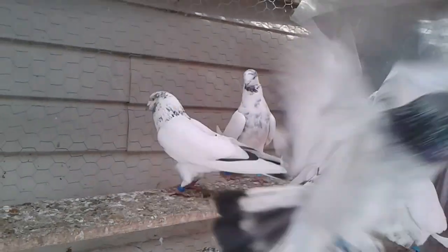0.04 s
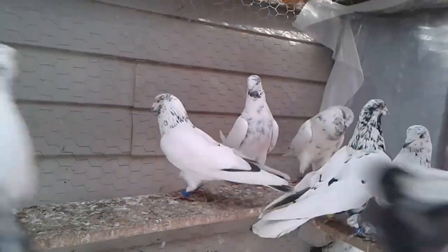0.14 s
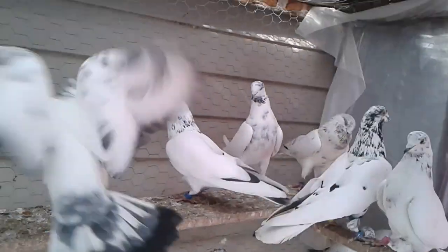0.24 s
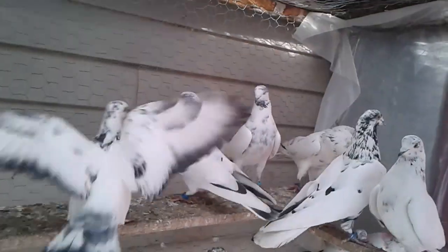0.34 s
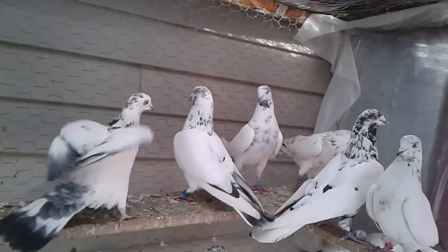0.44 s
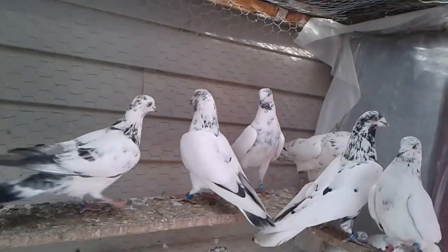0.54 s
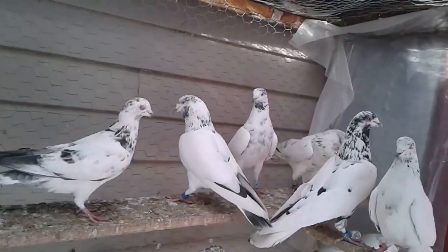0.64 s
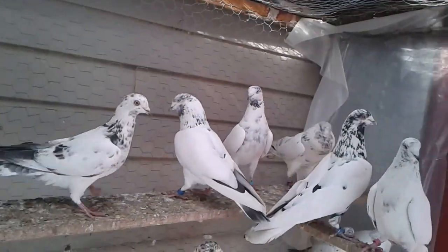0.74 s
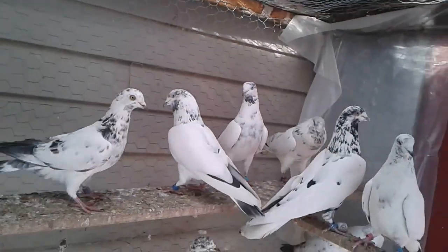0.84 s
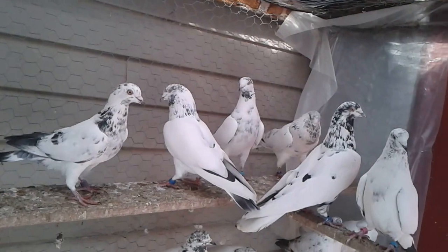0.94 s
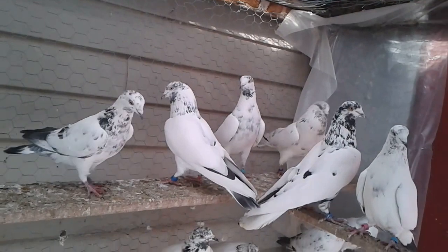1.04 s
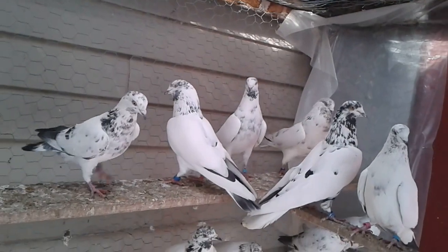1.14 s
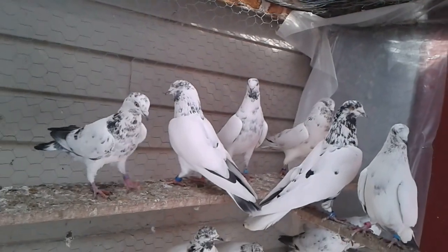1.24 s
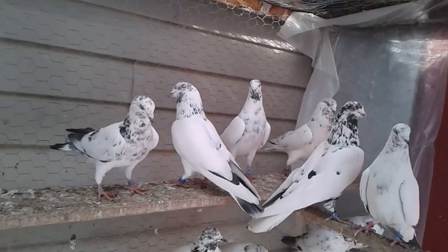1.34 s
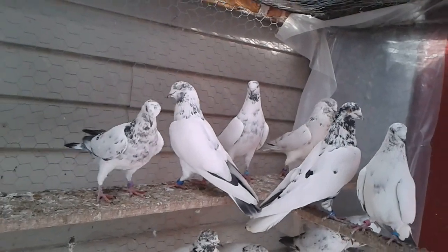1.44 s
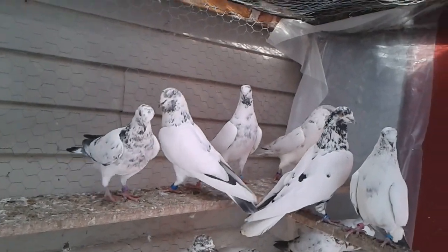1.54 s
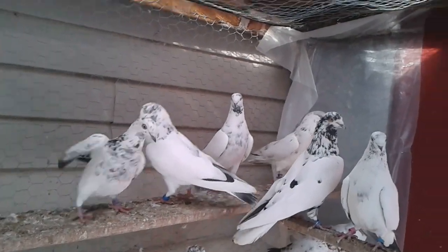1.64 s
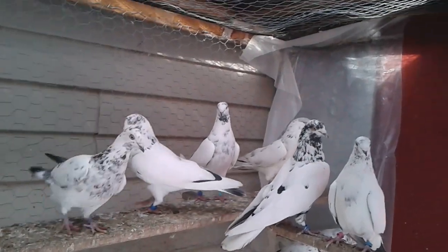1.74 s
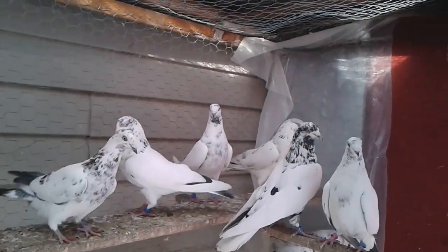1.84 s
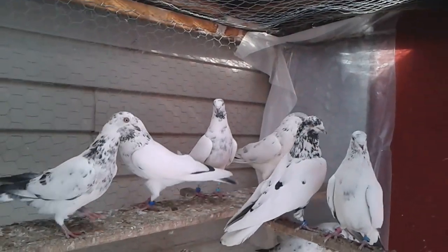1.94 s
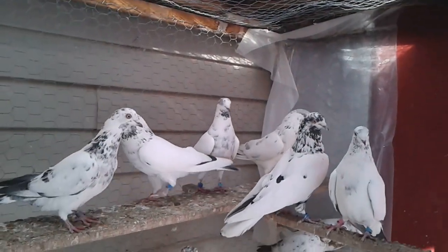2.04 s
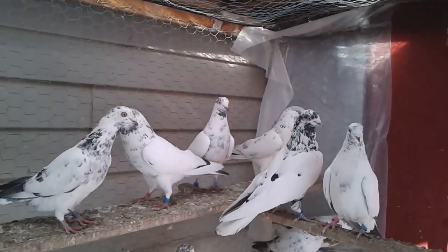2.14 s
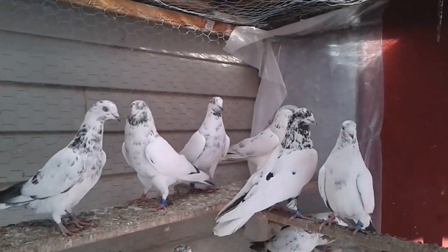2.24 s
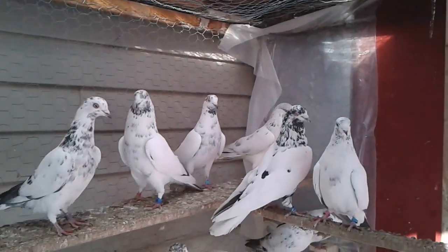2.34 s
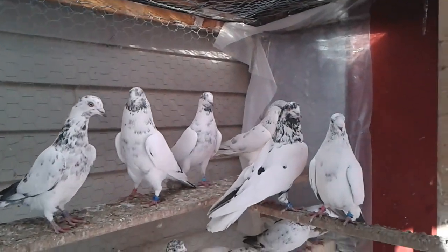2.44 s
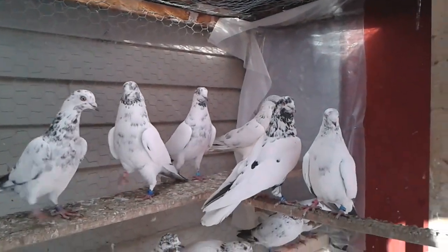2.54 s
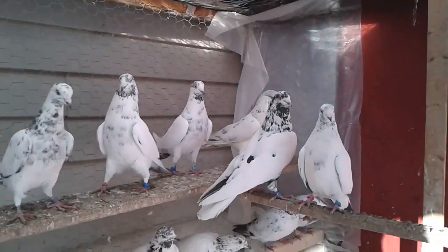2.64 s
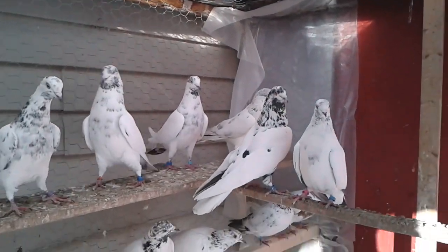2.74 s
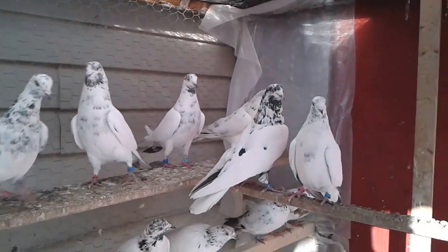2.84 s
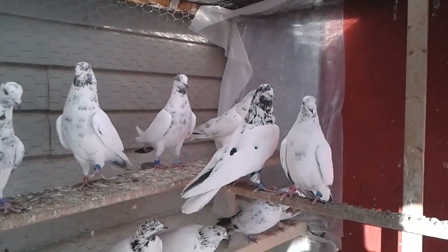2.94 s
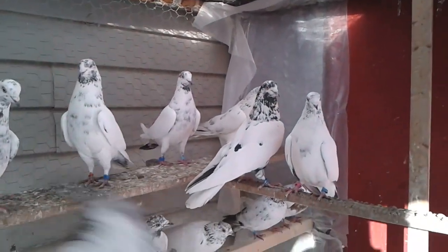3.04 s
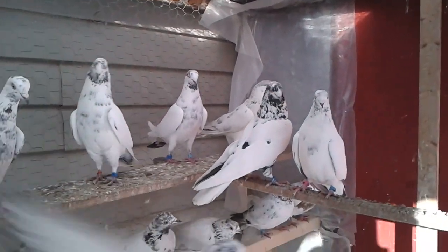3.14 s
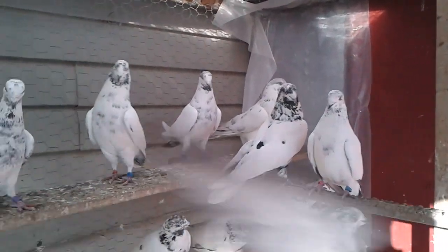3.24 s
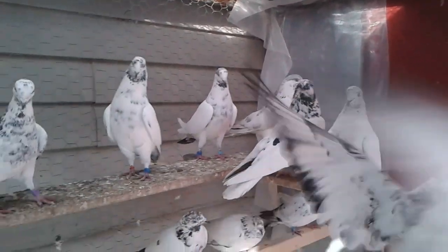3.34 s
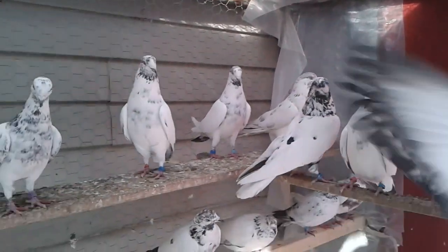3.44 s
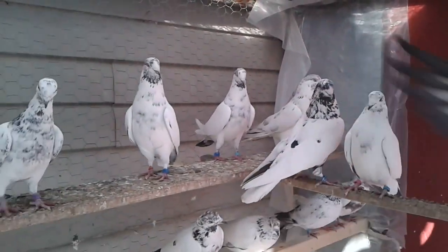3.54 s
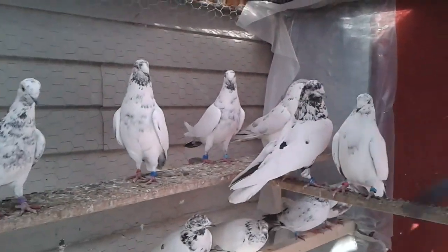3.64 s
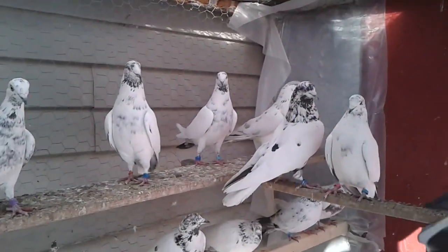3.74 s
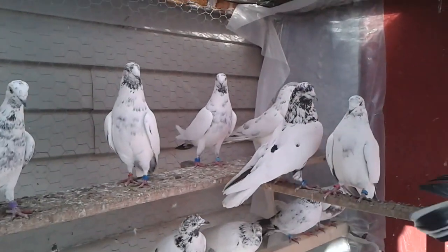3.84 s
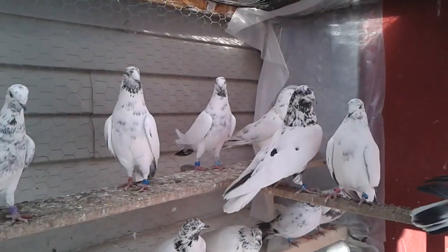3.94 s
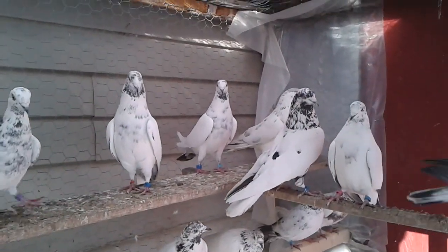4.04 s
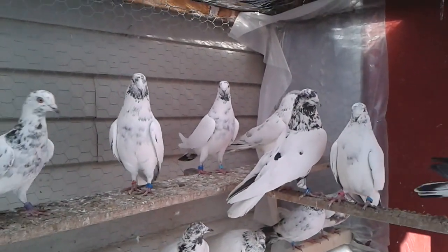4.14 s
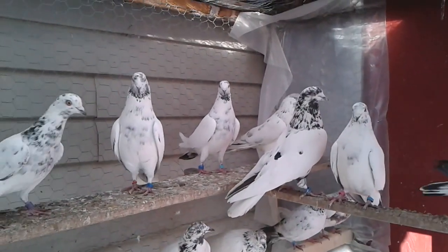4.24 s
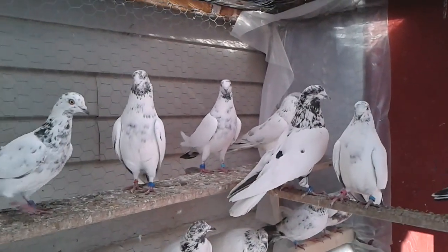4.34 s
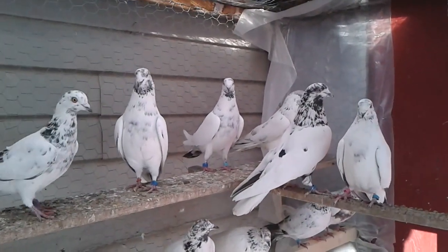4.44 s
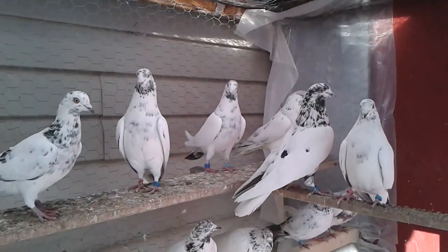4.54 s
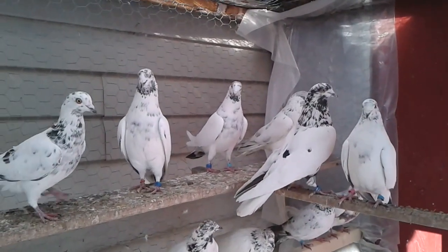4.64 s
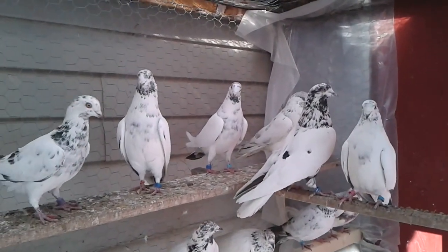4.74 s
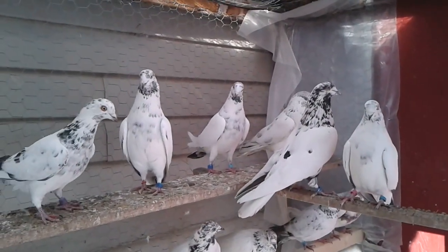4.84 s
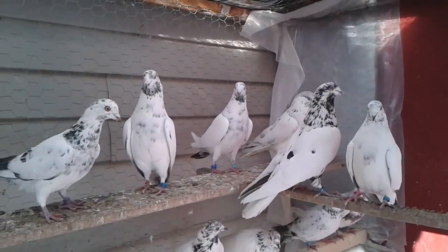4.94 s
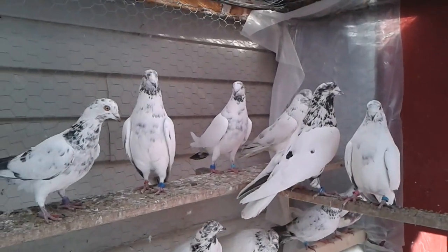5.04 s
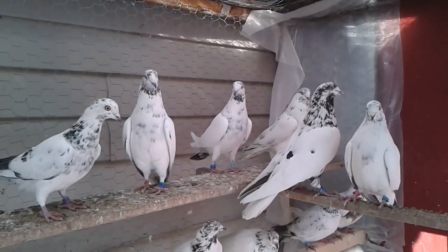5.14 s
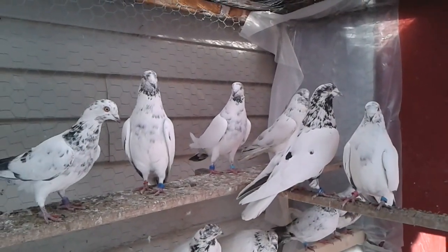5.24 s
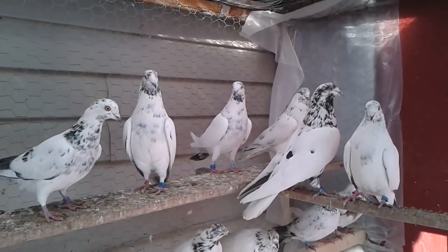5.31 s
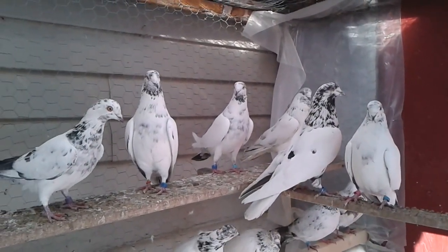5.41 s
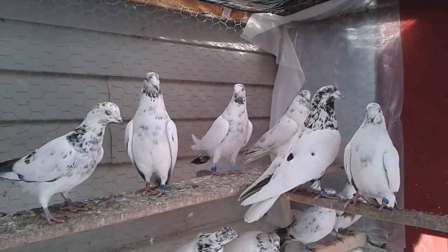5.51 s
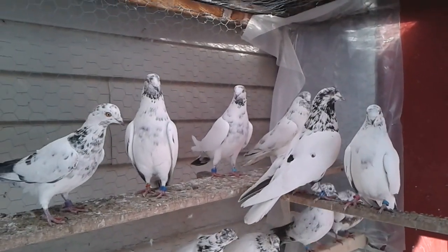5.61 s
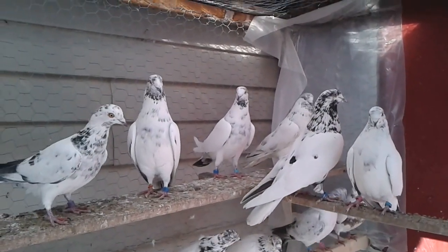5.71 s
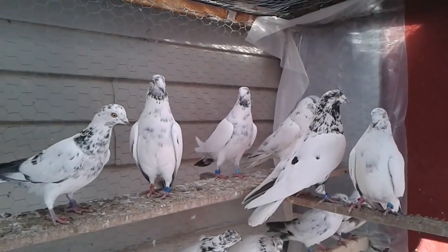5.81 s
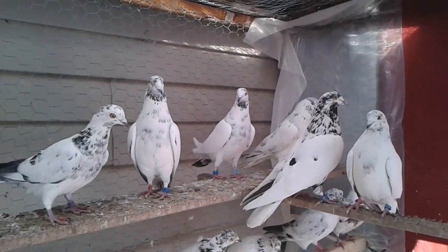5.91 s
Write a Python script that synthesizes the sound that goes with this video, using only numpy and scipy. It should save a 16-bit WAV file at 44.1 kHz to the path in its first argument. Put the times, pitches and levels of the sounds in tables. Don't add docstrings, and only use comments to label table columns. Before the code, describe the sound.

In a small wooden loft, a pigeon flaps hard past the microphone, others coo and cluck, another bird bursts by, and quiet settles.

```python
import sys
import numpy as np
from scipy import signal
from scipy.fft import rfft, irfft
from scipy.io import wavfile
from scipy.ndimage import uniform_filter1d

SR = 44100
rng = np.random.default_rng(int(sys.argv[2]) if len(sys.argv) > 2 else 0)


def linear_from_db(decibels):
    return 10 ** (np.asarray(decibels, float) / 20)


def transcribe(signal):
    frames = np.atleast_2d(signal).T
    limited = np.clip(frames, -1, 1)
    pcm = np.round(limited * 32767).astype(np.int16)
    wavfile.write(sys.argv[1], SR, pcm)


N = 263277


def evened(x):
    return x / np.sqrt(np.mean(x ** 2) + 1e-20)


def add(mix, s, sound):
    part = mix[round(s * SR):][:len(sound)]
    part += sound[:len(part)]


def blurred(x, frames, bins):
    in_time = uniform_filter1d(x, size=frames, axis=0)
    return evened(uniform_filter1d(in_time, size=bins, axis=1))


def wander(count, span_s):
    size = max(int(span_s * SR), 2)
    once = uniform_filter1d(rng.standard_normal(count), size)
    return evened(uniform_filter1d(once, size))


def coloured(points, patchy_db):
    frames, hz = N // 256 + 5, np.fft.rfftfreq(1024, 1 / SR)
    real, imaginary, patches = rng.standard_normal((frames, 513, 3)).T
    patches = blurred(patches, 12, 8)
    point_hz, point_db = np.transpose(points)
    shape_db = np.interp(np.log(hz + 1), np.log(point_hz + 1), point_db, -120, -120)
    z = (real + 1j * imaginary) * linear_from_db(shape_db[:, None] + patchy_db * patches)
    return evened(signal.istft(z, nperseg=1024, noverlap=768)[1][:N])


def hollow(shape, hz, width_hz):
    r = np.exp(-np.pi * width_hz / SR)
    poles = [1, -2 * r * np.cos(2 * np.pi * hz / SR), r * r]
    once = signal.lfilter([1, 0, -1], poles, rng.standard_normal(len(shape)))
    return shape * evened(signal.lfilter([1, 0, -1], poles, once))


def hush():
    # frequency_hz, density_db
    loft_spectrum = [(12, -50), (20, -32), (150, -11.5), (253, -13.5), (548, -18), (595, -21), (665, -16.5),
                     (722, -19), (806, -18.5), (1480, -34), (2180, -35.5), (4600, -40), (5500, -45),
                     (6800, -39), (14600, -35.5)]
    # centre_hz, width_hz, level_db
    narrow_hiss = (14430, 300, -74)
    hz, width_hz, level_db = narrow_hiss
    return linear_from_db(-55.5) * coloured(loft_spectrum, 1.6) + hollow(linear_from_db(level_db) * np.ones(N), hz, width_hz)


def wings():
    # time_s, feather_hiss_db
    stir = [(0, -36.5), (.13, -27.5), (.2, -30), (.5, -35.5), (.75, -50), (.83, -45), (.98, -50),
            (1.03, -45), (1.41, -60.5), (1.78, -54), (2.2, -52), (2.99, -56), (3.21, -33), (3.46, -38),
            (3.61, -48.5), (3.82, -60), (5.47, -67.5), (5.97, -61.5)]
    # frequency_hz, density_db
    body_spectrum = [(120, -32.5), (200, 0), (435, 0.5), (985, 0.5), (1230, -3), (1720, -6), (2000, -6),
                     (5500, -15.5), (7150, -40), (12100, -120)]
    # frequency_hz, density_db
    gust_spectrum = [(12, -38), (20, -1), (80, -6), (107, -2.5), (134, -3), (189, -1), (300, -3.5),
                     (520, -33), (880, -120)]
    # frequency_hz, density_db
    near_spectrum = [(880, -31.5), (1500, -3.5), (3290, -7.5), (3840, -3.5), (4150, -7), (4940, -4),
                     (11500, 1), (14100, -4), (15200, -9)]
    # frequency_hz, density_db
    turned_spectrum = [(1470, -12.5), (2500, -6), (2860, -12), (4020, -8), (5500, -16.5), (6500, -8),
                       (8000, 0.5), (9370, -5.5), (14500, -10), (15200, -29.5)]
    # start_s, end_s
    turn_times = (.45, 3.37)
    t = np.arange(N) / SR
    stir_db = np.interp(t, *np.transpose(stir))
    over_reference_db = stir_db + 33
    bright = linear_from_db(stir_db)
    low = linear_from_db(-36 + 0.87 * over_reference_db)
    gust = linear_from_db(-45 + 1.7 * over_reference_db) + linear_from_db(-64.5)
    downstrokes(low, gust)
    bright = np.sqrt(np.maximum(bright ** 2 - linear_from_db(-64) ** 2, linear_from_db(-78) ** 2))
    rung = np.zeros(N)
    swishes(bright, rung)
    snaps(bright, rung)
    claps(bright, rung)
    brushes(bright, rung)
    barbs = linear_from_db(2.0 * wander(N, .0008) + 1.5 * wander(N, .004) + 1.2 * wander(N, .015))
    turned = np.interp(t, turn_times, [0, np.pi / 2])
    hiss = np.cos(turned) * coloured(near_spectrum, 1.5) + np.sin(turned) * coloured(turned_spectrum, 1.5)
    feathers = barbs * (bright * hiss + low * coloured(body_spectrum, 3.0) + rung)
    return feathers + gust * linear_from_db(2.5 * wander(N, 0.058)) * coloured(gust_spectrum, 0.52)


def whistles():
    # middle_s, length_s, pitch_hz, level_db, octave_db
    flutters = [(0.055, 0.024, 790, -27, -21), (0.07, 0.026, 785, -19, -40.5), (.028, .02, 1600, -38, -50),
                (0.182, 0.02, 700, -23, -32), (.164, .018, 790, -29, -45), (0.366, 0.011, 1270, -15.5, -39),
                (.154, .013, 1720, -27, -50), (1.153, .014, 2550, -47, -70), (1.158, .016, 2150, -48, -70),
                (2.935, .03, 790, -48, -62), (3.322, .016, 1750, -29, -55), (3.1, .015, 1200, -39, -55),
                (1.462, .015, 2040, -52, -70), (2.815, .025, 3250, -54, -75), (3.143, .012, 2500, -35, -60),
                (3.152, .012, 2200, -31, -55), (3.43, .035, 690, -34, -52), (3.253, .016, 2400, -33.5, -55),
                (3.712, .02, 2050, -46.5, -65), (3.35, .015, 2400, -30, -50), (3.152, 0.022, 790, -30, -38),
                (3.226, 0.028, 860, -34, -25.5), (3.231, .012, 910, -23.5, -28),
                (3.25, .03, 1000, -33, -50), (3.208, 0.01194, 758, -29, -50), (3.327, 0.022, 786, -27, -35),
                (3.341, .018, 1090, -25, -30), (3.432, 0.01, 1060, -21.5, -40),
                (3.432, 0.01, 1680, -25, -38), (3.712, 0.021, 1088, -48.5, -50),
                (5.96, 0.02, 2110, -44, -67.5)]
    mix = np.zeros(N)
    for middle, length, hz, db, octave_db in flutters:
        t = np.arange(int(length * 1.45 * SR)) / SR
        unsteady = 1 + .025 * wander(len(t), .002) + .01 * wander(len(t), .008)
        turns = 2 * np.pi * np.cumsum(hz * unsteady) / SR
        note = linear_from_db(db) * np.sin(turns)
        note = note + linear_from_db(octave_db) * (np.sin(2 * turns) + 0.19 * np.sin(3 * turns))
        swell = np.hanning(len(t)) * linear_from_db(1.5 * wander(len(t), .003))
        add(mix, max(middle - 0.88 * length, 0), np.sqrt(2) * note * swell)
    return mix


def downstrokes(low, gust):
    # middle_s, body_db, gust_db, length_s
    strokes = [(0.068, -30, -46, 0.09), (0.12, -26, -30.5, 0.064), (.245, -29.5, -33, 0.11),
               (0.371, -24.5, -33, 0.094), (0.507, -44.5, -37, 0.086), (.32, -34, -45, .06),
               (0.82, -60, -43, 0.089), (0.597, -58, -43, 0.15), (0.69, -60, -39, .09),
               (1.811, -48, -66, 0.065), (3.144, -38, -42.5, 0.096), (3.214, -35, -42, .12),
               (3.283, -35.5, -43, 0.093), (3.353, -32.5, -37, 0.095), (3.439, -41, -40, 0.18),
               (3.717, -48.5, -65, 0.12)]
    for middle, body_db, gust_db, length in strokes:
        swell = np.hanning(int(length * SR))
        add(low, middle - length / 2, linear_from_db(body_db) * swell)
        add(gust, middle - length / 2, linear_from_db(gust_db) * swell)


def swishes(bright, rung):
    # middle_s, peak_db, length_s, hollow_db, hollow_hz
    sweeps = [(0.036, -19.5, 0.046, -16.5, 2340), (0.166, -21, 0.042, 1, 1560),
              (.27, -11, 0.058, -19.5, 647), (0.359, -1, 0.024, -19, 544), (0.411, -23.5, 0.0524, 4, 900),
              (0.658, -29, 0.035, -8, 1507), (0.8, -17, 0.042, -27, 1600), (1.712, -38, 0.05, -8, 900),
              (2.079, -29, 0.12, -12, 1480), (2.296, -38, 0.045, -4, 995), (2.945, -42, 0.064, 3.5, 1200),
              (3.041, -30.5, 0.078, -0.5, 2000), (3.112, -22, 0.051, -7.5, 1300),
              (3.144, -34, 0.043, 11.5, 2170), (3.251, -37, 0.042, 14, 2330),
              (3.393, -30, 0.044, 6.5, 1850), (3.745, -30, .03, -22, 2990), (3.715, -32, .04, -12, 2000),
              (3.625, -34, .03, -10, 1900), (4.381, -46, 0.033, -9, 1980), (4.546, -46.5, 0.034, -7, 1990),
              (4.607, -40, 0.042, -10.5, 900), (4.894, -48, 0.044, -7, 1800),
              (5.651, -36.5, 0.088, -12, 2570), (5.74, -42.5, 0.052, -9.5, 2160)]
    for middle, db, length, low_db, hz in sweeps:
        swell = np.hanning(int(1.54 * length * SR))
        add(bright, max(middle - 0.77 * length, 0), linear_from_db(db - 12.5) * swell)
        ring = hollow(linear_from_db(db + low_db - 9.5) * swell, hz, 1200)
        add(rung, max(middle - .75 * length, 0), ring)


def snaps(bright, rung):
    # start_s, peak_db, length_s
    tip_bursts = [(0.0908, -8.5, 0.006), (.2385, -9, .0065), (.1185, -16, .003), (3.4275, -31, .006),
                  (.6775, -39, .004)]
    for at, db, length in tip_bursts:
        count = int(length * SR)
        burst = linear_from_db(db) * signal.windows.tukey(count, .2) * np.linspace(1, .35, count)
        add(bright, at, burst)
        add(rung, at, hollow(linear_from_db(-7) * burst, 1600, 2600))


def contacts(bright, rung, rows, rise_s):
    u = np.arange(SR // 4) / SR
    crack, slide = linear_from_db(-60 * u / 0.04), linear_from_db(-60 * u / 0.086)
    for at, db, low_db, hz in rows:
        add(bright, at, linear_from_db(db - 12.5) * (1 - np.exp(-u / rise_s)) * (crack + 0.51 * slide))
        onset = 1 - np.exp(-u / (rise_s + .001))
        add(rung, at, hollow(linear_from_db(db + low_db - 7.0) * onset * slide, hz, 950))


def claps(bright, rung):
    # start_s, peak_db, hollow_db, hollow_hz
    wing_claps = [(0.0909, -8, -4, 1600), (0.118, 1.5, -12, 1560), (.1315, -6, -23.5, 966),
                  (.137, -10, -24.5, 1650), (0.24, -5.5, -10, 2700), (0.2812, -13, -26.5, 1500),
                  (0.3592, 3, -17, 1274), (0.381, -7, -8.5, 1870), (.4794, -24, -11, 993),
                  (.6775, -19.5, -10, 930), (0.9905, -16, -8.5, 1800), (1.7766, -31, -15, 3130),
                  (1.7928, -19.5, -5, 1590), (2.0327, -30, -17, 2360), (2.682, -34, -16, 2700),
                  (2.9211, -34, -6.5, 1820), (3.2156, -17.5, 2.5, 1690), (3.2275, -32.5, 13.5, 985),
                  (3.3291, -3.5, -11.5, 1720), (3.3454, -15, -2, 1850), (3.429, -15, -2, 990),
                  (5.9475, -36.5, -1, 2220)]
    contacts(bright, rung, wing_claps, .0003)


def thumps():
    # start_s, level_db, mode_hz, decay_t60_s
    blows = [(.12, -20, 520, 0.16), (0.24, -21, 460, 0.13), (.283, -21.5, 600, 0.1),
             (.35, -17.5, 510, 0.068), (0.482, -33, 230, 0.12), (.478, -30, 85, .2), (1.598, -43, 480, .07),
             (1.794, -41, 900, .07), (2.806, -48, 750, .07), (2.625, -49, 950, .07), (1.43, -49, 630, 0.46),
             (1.601, -38, 850, 0.12), (1.903, -40, 800, 0.063), (4.59, -47.5, 395, 0.18),
             (3.37, -30, 480, .1), (1.935, -40, 300, .08), (3.69, -43, 600, 0.091), (2.56, -47, 490, 0.56),
             (3.275, -33, 295, 0.1), (3.385, -33, 300, 0.1)]
    mix, u = np.zeros(N), np.arange(SR // 4) / SR
    for at, db, hz, t60 in blows:
        shape = linear_from_db(db - 60 * u / t60) * (1 - np.exp(-u / 0.0019))
        add(mix, at, hollow(shape, hz, 0.93 * hz))
    return mix


def coo(rows, held, rough):
    s, pitch_hz, effort_db = np.transpose(rows)
    crop_db, throat_hz, width_hz = held
    t = np.arange(s[0], s[-1], 1 / SR)
    hz, effort_db = np.interp(t, s, pitch_hz), np.interp(t, s, effort_db)
    first_db = effort_db + crop_db
    second_db = effort_db - 20 * np.log10(1 + ((2 * hz - throat_hz) / width_hz) ** 4)
    turns = 2 * np.pi * np.cumsum(hz * (1 + .02 * rough * wander(len(t), .004))) / SR
    tone = linear_from_db(first_db) * np.sin(turns)
    tone = tone + linear_from_db(second_db) * (np.sin(2 * turns + 1) + 0.036 * np.sin(3 * turns))
    tremble = linear_from_db(2.3 * np.sqrt(rough) * wander(len(t), .005))
    tremble = tremble + linear_from_db(-17) * wander(len(t), .0015)
    return s[0], np.sqrt(2) * tone * tremble * signal.windows.tukey(len(t), .12)


def coos():
    # time_s, pitch_hz, effort_db
    early_coos = [
        [(.392, 420, -44), (.41, 496, -30), (.438, 470, -31), (.47, 532, -29.5), (.51, 515, -31),
         (.578, 451, -28), (.592, 433, -45)],
        [(.6, 340, -41), (.62, 339, -40), (.646, 315, -54), (.674, 310, -38), (.76, 297.3, -41.5),
         (.816, 290, -38.5), (.83, 265, -54)],
        [(.95, 280, -50), (.975, 299.3, -42.5), (1.005, 313.2, -40.5), (1.04, 307, -38), (1.055, 300, -49),
         (1.085, 311, -42), (1.12, 292, -47.5), (1.16, 275, -52)],
        [(1.16, 399, -40), (1.185, 340.5, -36.5), (1.225, 276, -39), (1.245, 272, -50), (1.27, 273, -41),
         (1.31, 282.7, -36.5), (1.365, 292.4, -35), (1.385, 328, -36), (1.4, 317.4, -50)],
    ]
    # time_s, pitch_hz, effort_db
    late_coos = [
        [(1.95, 256, -47), (1.976, 275, -42), (2.01, 302, -41), (2.04, 325, -47), (2.065, 362, -48),
         (2.1, 374, -44), (2.14, 363, -50)],
        [(2.13, 296, -42), (2.16, 323, -46), (2.19, 315, -47), (2.215, 295, -43), (2.24, 320, -42)],
        [(2.23, 481.5, -40), (2.27, 375, -32), (2.31, 325.5, -31.5), (2.34, 289.5, -34), (2.375, 277.3, -35),
         (2.419, 284.3, -35), (2.455, 312, -31), (2.475, 335, -42)],
        [(2.488, 251, -45), (2.495, 262.4, -31.5), (2.52, 252, -39), (2.535, 240, -56)],
    ]
    # crop_db under the first partial, throat_hz, throat_width_hz
    throats = [(0, 620, 98), (0.5, 480, 90), (-18, 600, 200), (-3, 575, 77), (-14, 720, 260),
               (-10, 620, 200), (0, 567, 70), (-7.5, 510, 200)]
    # start_s, end_s, pitch_hz, level_db
    far_coos = [
        (1.44, 1.928, 289.6, -57),
        (2.66, 3.01, 302, -58),
        (4.2, 5.247, 328.3, -66.5),
    ]
    # crop_db, throat_hz, width_hz
    far_throat = (0, 617, 34)
    mix = np.zeros(N)
    for rows, held in zip(early_coos + late_coos, throats):
        add(mix, *coo(rows, held, 1.0))
    for start, end, hz, db in far_coos:
        add(mix, *coo([(start, hz, db), (end, hz, db)], far_throat, 5))
    return mix


def brushes(bright, rung):
    # start_s, peak_db, hollow_db, hollow_hz
    feather_brushes = [(.625, -25.5, -23, 1850), (0.7939, -15, -16, 1707), (.9027, -33, -22, 972),
                       (1.2042, -36, -16.5, 1345), (1.4525, -41, -11, 913), (1.865, -37, -3, 1820),
                       (1.9992, -30.5, -15, 1000), (2.1496, -33, -16.5, 1020), (2.1906, -28.5, -23, 902),
                       (2.3035, -31.5, -9, 940), (2.803, -42, 1, 993), (3.126, -20, -1, 1690),
                       (3.1894, -1.5, -16, 1620), (3.488, -18, -3, 1490), (3.532, -26, -19.5, 2070),
                       (3.612, -25.5, -8, 1780), (3.664, -25, -14, 1170), (2.9899, -36, -2, 2198),
                       (1.6359, -37, -15, 1000), (2.3438, -38, -15, 1000), (2.8958, -33, -15.5, 1760),
                       (3.694, -30, -13, 2000), (3.702, -29, -13, 2000)]
    contacts(bright, rung, feather_brushes, .0025)


def gurgle(db, crop_hz, throat_hz, throat_db, length):
    count = int(length * SR)
    even = np.arange(0, length, .016)
    uneven = np.r_[0, rng.uniform(-.002, .002, 40)][:len(even)]
    at = (np.clip(even + uneven, 0, length) * SR).astype(int).clip(0, count - 1)
    puffs = np.zeros(count)
    puffs[at] = linear_from_db(-12 * at / SR / length) * (-1) ** np.arange(len(at))
    u = np.arange(2000) / SR
    soft = 1 - np.exp(-u / 0.0026)
    crop = linear_from_db(-60 * u / 0.063) * np.sin(2 * np.pi * crop_hz * u)
    opened = u - .15 * 0.0079 * (1 - np.exp(-u / .008))
    throat = linear_from_db(throat_db - 60 * u / 0.045) * np.sin(2 * np.pi * throat_hz * opened)
    return linear_from_db(db) * signal.fftconvolve(puffs, soft * (crop + throat))


def gurgles():
    # start_s, peak_db, crop_hz, throat_hz, length_s
    clucks = [(0.818, -37, 296, 500, 0.02), (0.934, -27, 298, 587, 0.014), (1.027, -25, 328, 593, 0.035),
              (1.389, -32, 304, 500, 0.052), (1.854, -33.5, 205, 458, 0.073), (2.006, -23, 337, 589, 0.062),
              (2.114, -20.5, 368, 530, .043), (2.217, -21, 313, 570, 0.034),
              (2.491, -27.5, 328, 505, .0224), (1.936, -33, 300, 480, .014)]
    openings = [6, 0.5, 3.5, 0, 3, -7, -0.5, 0.5, 2.5, -9]
    mix = np.zeros(N)
    for (s, db, crop_hz, throat_hz, length), throat_db in zip(clucks, openings):
        add(mix, s - .001, gurgle(db, crop_hz, throat_hz, throat_db, length))
    return mix


def claws():
    # start_s, peak_db, claw_hz, wood_db, wood_hz
    ticks = [(3.5314, -19.5, 8900, -21, 2200), (3.5661, -26, 8410, -25, 2100),
             (3.6489, -32, 8080, -21, 2200), (3.6658, -21, 8060, -26, 1200), (3.806, -38, 8240, -17, 2200),
             (3.8494, -46, 8770, -15, 2200), (3.9665, -31.5, 8700, -17, 2300),
             (3.9961, -42.5, 6000, -21, 2200), (4.0973, -35, 8000, -15.5, 2600),
             (4.139, -40, 8000, -16, 2300), (4.146, -32, 7870, -20, 2200),
             (4.1656, -34.5, 8060, -27.5, 2210), (4.446, -34, 8600, -14.5, 2300),
             (4.6861, -29.5, 8260, -13.5, 2870), (4.7159, -34, 8600, -25, 2190),
             (4.767, -31.5, 7640, -21, 2190), (4.9504, -41, 6500, -10.5, 2395),
             (5.1778, -44, 8100, -21.5, 2200), (2.6661, -36.5, 5700, -20, 2200),
             (2.716, -42, 7260, -20, 2200), (1.3216, -42, 8800, -19, 2200), (1.3635, -46, 7900, -20, 2200),
             (1.507, -44, 6760, -18, 2100)]
    mix, u = np.zeros(N), np.arange(SR // 4) / SR
    for at, db, hz, wood_db, wood_hz in ticks:
        tick = linear_from_db(-60 * u / 0.02) + 0.32 * linear_from_db(-60 * u / 0.14)
        add(mix, at, hollow(linear_from_db(db - 8.5) * tick, hz, 2100))
        add(mix, at, hollow(linear_from_db(db - 15 - 60 * u / .012), 11000, 6000))
        answer = linear_from_db(db + wood_db + 1.5) * (1 - np.exp(-u / 0.0044)) * linear_from_db(-60 * u / 0.11)
        add(mix, at + 0.0043, hollow(answer, wood_hz, 1700))
    return mix


def buzzes():
    # middle_s, length_s, slap_rate_hz, level_db
    slaps = [(3.043, .045, 260, -40)]
    mix = np.zeros(N)
    for middle, length, hz, db in slaps:
        t = np.arange(int(length * SR)) / SR
        turns = 2 * np.pi * np.cumsum(hz * (1 + .006 * wander(len(t), .004))) / SR
        buzz = sum(linear_from_db(3 * rng.standard_normal()) * np.cos(k * turns + k * k) for k in range(4, 11))
        add(mix, middle - length / 2, linear_from_db(db) * evened(buzz) * np.hanning(len(t)))
    return mix


def loft(x):
    at = np.arange(150, SR // 3, 22)
    taps = np.zeros(SR // 3 + 22)
    signs = rng.choice([-1., 1.], len(at))
    taps[at + rng.integers(0, 22, len(at))] = signs * linear_from_db(-60 * at / SR / 0.26)
    return signal.fftconvolve(x, taps / np.linalg.norm(taps))[:N]


def scene():
    birds = coos() + gurgles()
    air = wings() + whistles() + buzzes() + thumps() + claws()
    mix = birds + air + linear_from_db(-11.0) * loft(birds) + linear_from_db(-13.5) * loft(air) + hush()
    return np.array([mix, mix])


def thinned(x):
    # time_s, threshold_spreads above the mean
    thresholds = [(0, 2.2), (2.9, 1.8), (3.25, 1), (3.55, .5), (3.72, -.6), (3.85, .2), (3.95, 1.8),
                  (6, 1.7)]
    hz, t, z = signal.stft(x, SR, nperseg=1024, noverlap=768)
    strips = blurred(rng.standard_normal((len(t), len(hz))), 12, 6).T
    need = np.interp(t, *np.transpose(thresholds)) + ((hz[:, None] - 5450) / 600) ** 4
    gated = z * np.where(strips > need, linear_from_db(-30), 1)
    return signal.istft(gated, SR, nperseg=1024, noverlap=768)[1][:, :N]


def channel_grain(x):
    # middle_s, level_db re the sound
    splits = [(.128, -17), (.685, -26), (1.471, -20), (3.349, -15.5), (3.51, -16), (4.115, -18),
              (4.48, -15.5), (4.545, -19.5), (4.71, -19)]
    grain, size = np.zeros(N), 2048
    for middle, db in splits:
        at = round(middle * SR) - size // 2
        spectrum = abs(rfft(x[at:at + size] * np.hanning(size)))
        scattered = irfft(spectrum * np.exp(2j * np.pi * rng.random(size // 2 + 1)))
        add(grain, at / SR, linear_from_db(db + 6.5) * scattered * signal.windows.tukey(size, .5))
    return grain


def band_limit(x):
    return signal.sosfilt(signal.butter(12, 15340, fs=SR, output="sos"), x)


def record(dry):
    low_pass = signal.firwin(601, 14680, window=("kaiser", 7), fs=SR)
    limited = signal.oaconvolve(dry, low_pass[None], "same")
    limited = signal.lfilter(*signal.butter(1, 35, "high", fs=SR), limited)
    limited = thinned(limited)
    grain = channel_grain(limited[0])
    return band_limit(np.clip(limited + [grain, -grain], -1, 1))


dry = scene()
out = record(dry)
transcribe(out)
```